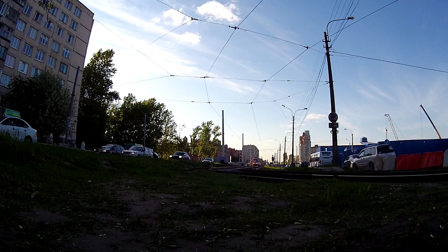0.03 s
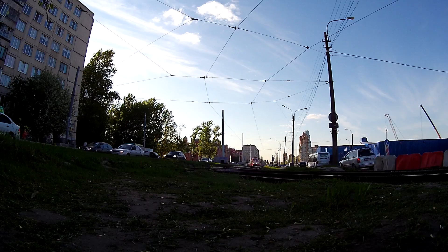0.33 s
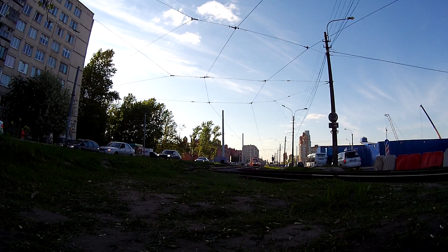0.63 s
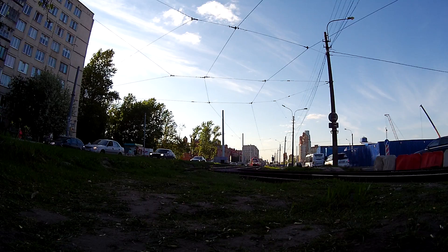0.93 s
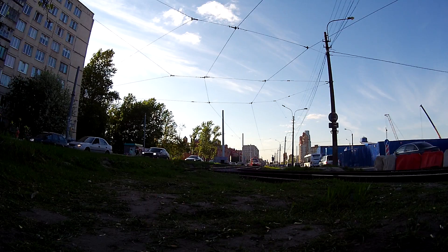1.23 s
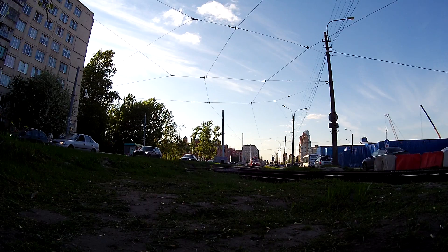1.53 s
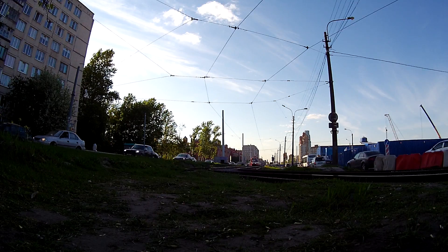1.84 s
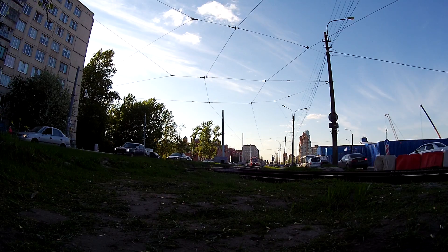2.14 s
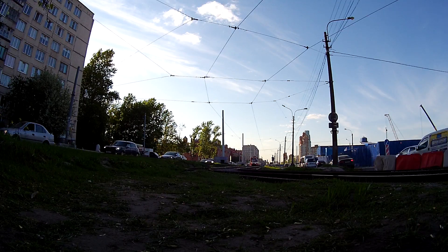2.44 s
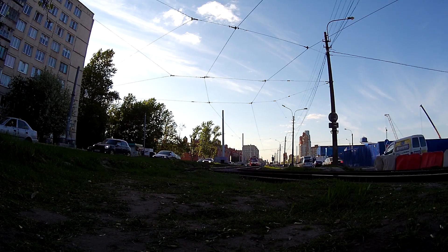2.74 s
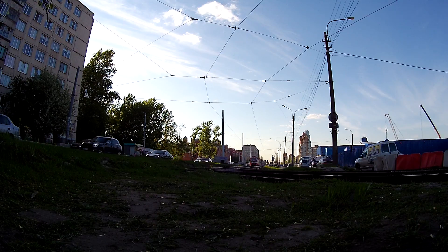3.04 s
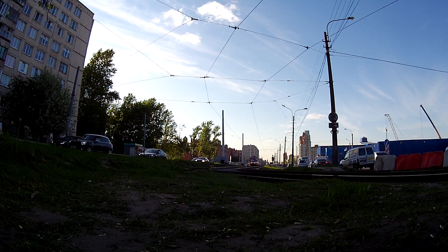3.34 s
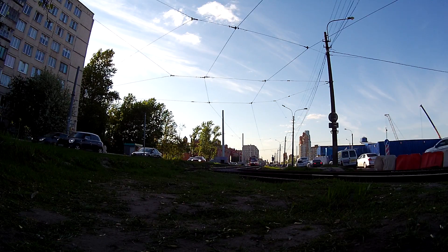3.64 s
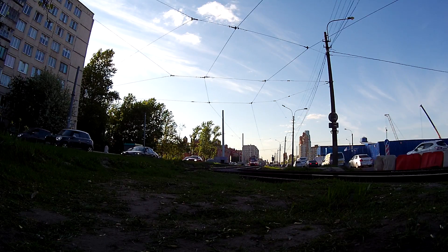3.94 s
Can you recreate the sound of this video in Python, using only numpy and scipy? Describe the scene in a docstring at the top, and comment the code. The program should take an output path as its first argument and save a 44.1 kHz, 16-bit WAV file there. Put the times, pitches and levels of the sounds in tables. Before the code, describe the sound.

Traffic rumbles along a street, with engines pulling away and light wind on the microphone.

```python
"""A city street heard from the grass verge. From the start, tyres roar, light wind rumbles on the
microphone and two engines pull away in low gear, their pitch climbing as they fire faster.
Right after the sound begins, the microphone's casing clicks and rings. Faint high rustles come
and go, joined by a brief squeak, then by thin falling chirps and crisp ticks. Past halfway a
faint whine swells and fades, and two more squeaks come near the end."""
import sys
import numpy as np
from scipy import signal
from scipy.io import wavfile

SR = 44100
rng = np.random.default_rng(int(sys.argv[2]) if len(sys.argv) > 2 else 0)


def transcribe(u):
    """Save the signal u as a 16-bit wav file named by the first command-line argument.

    u: samples, shape (n,) or (channels, n), limited to [-1, 1]; the rate is SR.
    q: integer samples, one column per channel.
    """
    v = np.clip(np.atleast_2d(u).T, -1, 1)
    q = np.round(v * 32767).astype(np.int16)
    wavfile.write(sys.argv[1], SR, q)


N = 176400
T = np.arange(N) / SR

# Tyre roar, from low to high: pitch_hz, relative_db
TYRE_SPECTRUM = [(90, -3.5), (140, 1), (190, -4), (250, -4), (400, -8.5), (490, -6), (620, -9.5),
                 (800, -9.5), (1050, -11.5), (1300, -20.5), (1600, -25), (2000, -38.5), (2800, -41),
                 (4500, -43), (6500, -44.5), (8000, -50.5), (10500, -47.5), (15000, -53)]
# How the roar swells: time_s, change_db
TYRE_SWELL = [(0.1, 1.5), (0.6, 0.4), (1.5, -.3), (2.3, 0.3), (3.2, -0.1), (4.0, 0)]
# Tread noise of the nearest tyres: time_s, level_db
TREAD_LEVELS = [(0.1, -61), (0.8, -60), (1.6, -58), (2.3, -57.5), (3.2, -58.5), (4.0, -60.5)]
# Rumble of wind and traffic: pitch_hz, relative_db
RUMBLE_SPECTRUM = [(22, -21), (32, -9), (42, -2), (55, 1.5), (80, -1.5), (110, -3.5), (160, -11.5),
                   (300, -26.5)]
# How loud the rumble is: time_s, level_db
RUMBLE_LEVELS = [(0.1, -43.5), (0.8, -43), (1.2, -45), (1.8, -42), (2.2, -44.5), (3.0, -44.5), (3.5, -44),
                 (4.0, -44.5)]
# How loud the traffic drone is: time_s, level_db
DRONE_LEVELS = [(0.1, -54), (0.8, -54), (1.6, -57), (2.3, -55.5), (3.0, -52.5), (3.6, -53), (4.0, -53)]
# First car's firing rate: time_s, pitch_hz
FIRST_CAR_PITCH = [(0.1, 49.54), (1.1, 49.89), (1.5, 57.14), (2.0, 64), (2.5, 73.43), (3.0, 82.18),
                   (3.5, 90.54), (4.0, 97.9)]
# Its tones at 1, 2 and 3 times that rate: time_s, first_db, second_db, third_db
FIRST_CAR_LEVELS = [(0.1, -47, -49.5, -55.5), (0.9, -40.5, -47.5, -52), (1.2, -44.5, -45, -50.5),
                    (1.7, -40.5, -53, -60), (2.15, -44, -47.5, -59), (2.55, -39.5, -46.5, -54),
                    (2.9, -38.5, -47.5, -59), (3.18, -38.5, -52, -53.5), (3.3, -51.5, -56, -52.5),
                    (3.55, -48, -64.5, -47.5), (4.0, -52, -52, -55)]
# Second car's firing rate and base level: time_s, pitch_hz, level_db
SECOND_CAR_PULL = [(0.1, 68, -45.5), (0.6, 74, -47.5), (1.0, 79, -42), (1.5, 82.7, -40), (1.85, 85.3, -38),
                   (2.2, 88, -45.5), (3.0, 93, -41.5), (3.5, 96, -61), (4.0, 99, -50)]
# Its tones: multiple_of_firing_rate, relative_db
SECOND_CAR_TONES = [(1, 1), (2, -21), (3, -20), (4, -21.5)]
# Clicks of the casing: start_s, base_level_db
CASING_CLICKS = [(0.0802, -49.5), (0.087, -62), (0.103, -58), (0.109, -61), (0.126, -60.5), (0.133, -64)]
# Notes the casing rings at: pitch_hz, relative_db, fade_s (time to drop 60 dB)
CASING_NOTES = [(3050, 1.5, .055), (3785, 1, 0.066), (4440, -2.5, 0.045), (5480, -5.5, 0.059),
                (5965, -5, 0.048), (6550, -5.5, 0.063), (7100, -10, 0.033), (8300, -11, 0.033)]
# High rustles: middle_s, length_s, level_db
RUSTLE_SWELLS = [(0.097, 0.18, -74), (1.11, .1, -78.5), (2.351, .2, -88), (2.73, .14, -76.5),
                 (3.256, 0.17, -72.5), (3.44, 0.046, -74), (3.59, .06, -69), (3.75, 0.062, -76)]
# The hiss they are made of: pitch_hz, relative_db
RUSTLE_SPECTRUM = [(2500, -4), (6000, -5.5), (9000, -10), (12500, -4), (15000, -4)]
# Brief squeaks: middle_s, length_s, pitch_hz, level_db
SQUEAKS = [(0.425, 0.023, 11430, -73), (3.574, 0.023, 8370, -67), (3.586, .028, 12000, -62.5)]
# Thin chirps: middle_s, level_db
FALLING_CHIRPS = [(0.95, -77), (2.22, -78), (3.24, -74)]
# Crisp ticks: middle_s, pitch_hz, level_db
CRISP_TICKS = [(1.098, 12600, -64), (1.12, 12900, -64), (2.5, 11000, -72), (2.785, 12000, -72),
               (3.195, 12000, -69), (3.574, 14000, -64), (3.609, 13600, -60), (3.608, 6350, -67.5),
               (3.85, 13200, -71)]


def from_db(db):
    """Turn decibels into a number to multiply by."""
    return 10 ** (np.asarray(db) / 20)


def rms_one(x):
    """Scale a signal so its average strength (rms) is 1."""
    return x / np.sqrt(np.mean(x ** 2) + 1e-20)


def in_time(rows):
    """Join a table's points with lines: one curve for each column after time_s."""
    times, *columns = np.transpose(rows)
    return [np.interp(T, times, column) for column in columns]


def drift(rate_hz):
    """A smooth random wander, about 1 in size."""
    r = np.exp(-2 * np.pi * rate_hz / SR)
    return rms_one(signal.lfilter([1], [1, -2 * r, r * r], rng.standard_normal(N + SR))[SR:])


def swell(middle_s, length_s):
    """A bell-shaped rise and fall in level."""
    return np.exp(-2 * ((T - middle_s) / length_s) ** 2)


def noisy_tone(hz, width_hz):
    """A narrow band of noise around a steady or moving pitch."""
    phase = 2 * np.pi * np.cumsum(hz * np.ones(N)) / SR
    return rms_one(drift(width_hz / 2) * np.cos(phase) + drift(width_hz / 2) * np.sin(phase))


def keep_band(noise, low_hz, high_hz):
    """Keep the noise between two pitches; drop the first second, while the filter settles."""
    sos = signal.butter(2, [low_hz, high_hz], "band", fs=SR, output="sos")
    return signal.sosfilt(sos, noise)[SR:]


def noise_between(low_hz, high_hz):
    """One steady band of noise, at strength 1."""
    return rms_one(keep_band(rng.standard_normal(N + SR), low_hz, high_hz))


def banded_noise(spectrum, flicker_db, flicker_hz):
    """Noise in bands a third of an octave wide, each flickering on its own."""
    edges = 20 * 2 ** (np.arange(30) / 3)
    hz, db = np.transpose(spectrum)
    out, white = 0, rng.standard_normal((2, N + SR))
    for k, (low, high) in enumerate(zip(edges, edges[1:])):
        if high > hz[0] and low < hz[-1]:
            band = keep_band(white[k % 2], low, high)
            band_db = np.interp(np.log(low * high) / 2, np.log(hz), db)
            out += band * from_db(band_db + flicker_db * drift(flicker_hz))
    return rms_one(out)


def street():
    """Rolling tyres roar, wind and traffic rumble, and the traffic drones a little higher up."""
    roar_level = from_db(-45 + in_time(TYRE_SWELL)[0])
    roar = roar_level * banded_noise(TYRE_SPECTRUM, flicker_db=0.67, flicker_hz=7.6)
    rumble_level = from_db(in_time(RUMBLE_LEVELS)[0])
    rumble = rumble_level * banded_noise(RUMBLE_SPECTRUM, flicker_db=4, flicker_hz=9)
    tread = from_db(in_time(TREAD_LEVELS)[0]) * noise_between(low_hz=884, high_hz=1164)
    drone = from_db(in_time(DRONE_LEVELS)[0]) * noise_between(low_hz=215, high_hz=390)
    return roar + rumble + tread + drone


def engine(firing_hz, tones, wobble=0.0042, flutter_db=1.3):
    """An exhaust hums at multiples of its slightly unsteady firing rate; each tone flutters."""
    phase = 2 * np.pi * np.cumsum(firing_hz * (1 + wobble * drift(3.47))) / SR
    out = 0
    for multiple, db in tones:
        level = np.sqrt(2) * from_db(db + flutter_db * drift(7.9))
        out += level * np.sin(multiple * phase + rng.uniform(0, 2 * np.pi))
    return out


def cars():
    """Two engines speed up at different rates, and their tones beat against each other."""
    first = engine(in_time(FIRST_CAR_PITCH)[0], enumerate(in_time(FIRST_CAR_LEVELS), 1))
    hz, db = in_time(SECOND_CAR_PULL)
    second = engine(hz, [(multiple, db + tone_db) for multiple, tone_db in SECOND_CAR_TONES])
    return first + second


def casing(ring_db=-9, crack_db=2, crack_s=0.0027, hiss_fade_s=1.6):
    """Each click is a short crack that sets the loose casing ringing; a faint hiss lingers."""
    hiss = from_db(-73.5 - 60 * T / hiss_fade_s) * noisy_tone(7030, width_hz=710)
    notes = [(from_db(db) * noisy_tone(hz, width_hz=220), fade_s) for hz, db, fade_s in CASING_NOTES]
    clicks = 0
    for start_s, db in CASING_CLICKS:
        age = np.maximum(T - start_s, 0)
        ring = sum(note * from_db(ring_db - 60 * age / fade_s) for note, fade_s in notes)
        crack = from_db(crack_db) * np.exp(-age / crack_s) * noisy_tone(5500, width_hz=4000)
        clicks += (T > start_s) * from_db(db) * (ring + crack)
    return hiss + clicks


def rustles(floor_db=-85.5, grain_db=2.5):
    """Soft, grainy swishes with a high ring rise out of a very faint hiss."""
    power = sum((from_db(db) * swell(s, length_s)) ** 2 for s, length_s, db in RUSTLE_SWELLS)
    level = np.sqrt(from_db(floor_db) ** 2 + power)
    hiss = banded_noise(RUSTLE_SPECTRUM, flicker_db=1.1, flicker_hz=22)
    ring = from_db(-1) * noisy_tone(12170, width_hz=1500)
    grain = from_db(grain_db * drift(120))
    return level * rms_one((hiss + ring) * grain)


def squeaks():
    """Each squeak is one brief, rough, high tone."""
    return sum(from_db(db) * swell(s, length_s) * noisy_tone(hz, width_hz=120)
               for s, length_s, hz, db in SQUEAKS)


def chirps(middle_hz=3810, length_s=0.08, fall_per_s=3.0):
    """Far, blurred chirps slide downward."""
    out = 0
    for middle_s, db in FALLING_CHIRPS:
        hz = middle_hz * np.exp(-fall_per_s * np.clip(T - middle_s, -length_s, length_s))
        out += from_db(db) * swell(middle_s, length_s) * noisy_tone(hz, width_hz=690)
    return out


def ticks():
    """Tiny bursts of high noise tick among the rustles."""
    return sum(from_db(db) * swell(s, length_s=0.0048) * noisy_tone(hz, width_hz=1100)
               for s, hz, db in CRISP_TICKS)


def whine(middle_s=2.6, middle_hz=496, rise_hz_per_s=35):
    """One faint, slowly climbing tone comes briefly out of the traffic."""
    hz = middle_hz + rise_hz_per_s * (T - middle_s)
    return swell(middle_s, length_s=0.35) * from_db(-57.5) * engine(hz, [(1, 0)])


def scene():
    """The traffic and the small, high sounds add up at one microphone."""
    traffic = street() + cars() + whine()
    small_sounds = rustles() + ticks() + squeaks() + chirps() + casing()
    return (traffic + small_sounds)[None]


def record(dry, start_s=0.07, fade_s=0.0074, cutoff_hz=15300):
    """The sound fades in quickly after a moment of silence; the highest treble is cut."""
    fade_in = np.clip((T - start_s) / fade_s, 0, 1)
    treble_cut = signal.ellip(10, 0.1, 80, cutoff_hz, fs=SR, output="sos")
    return signal.sosfilt(treble_cut, dry * fade_in)


dry = scene()
out = record(dry)
transcribe(out)
```